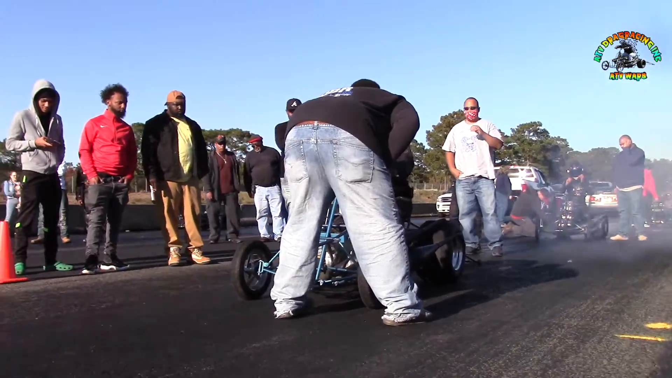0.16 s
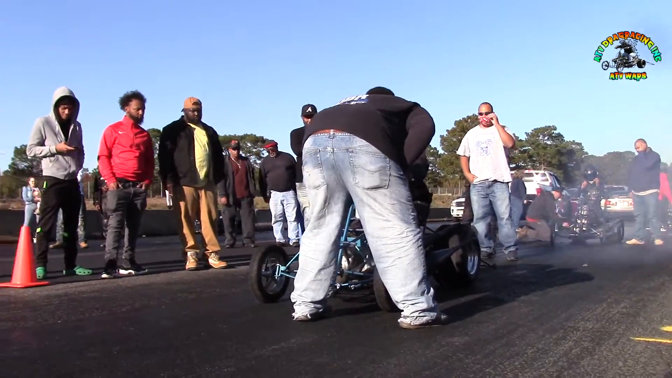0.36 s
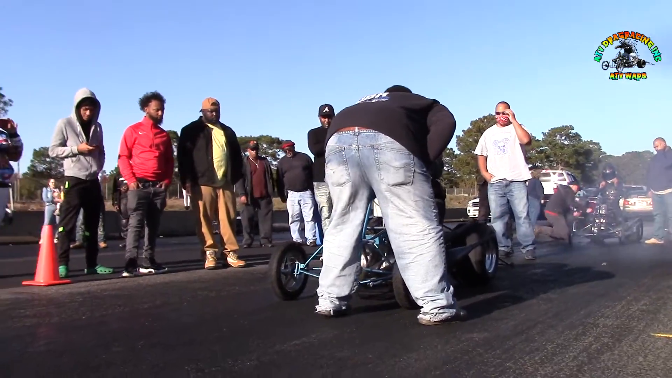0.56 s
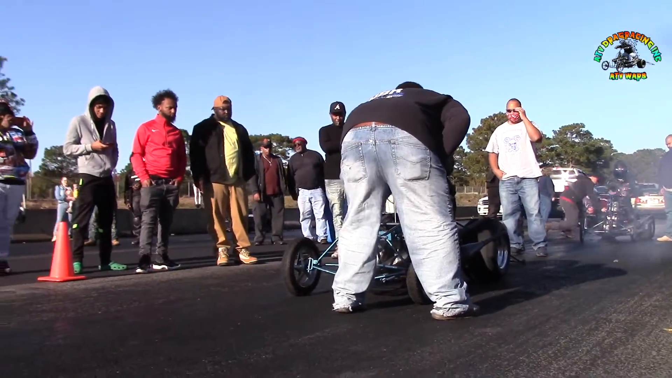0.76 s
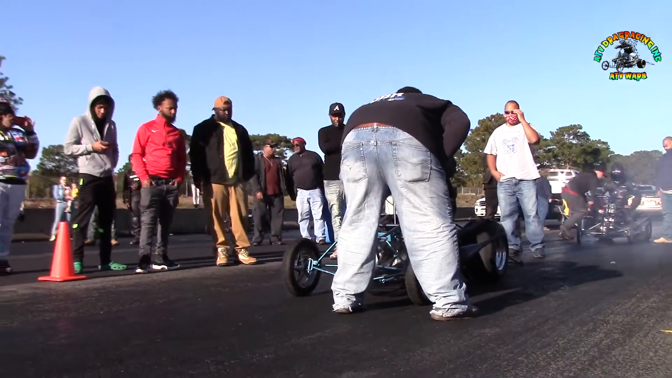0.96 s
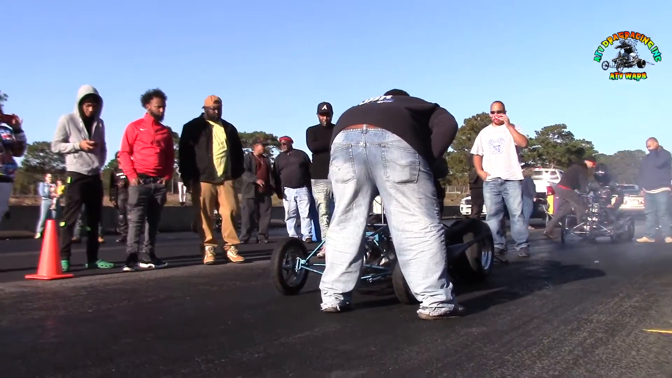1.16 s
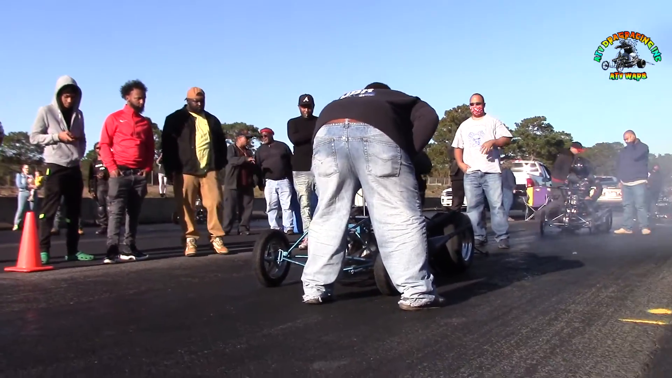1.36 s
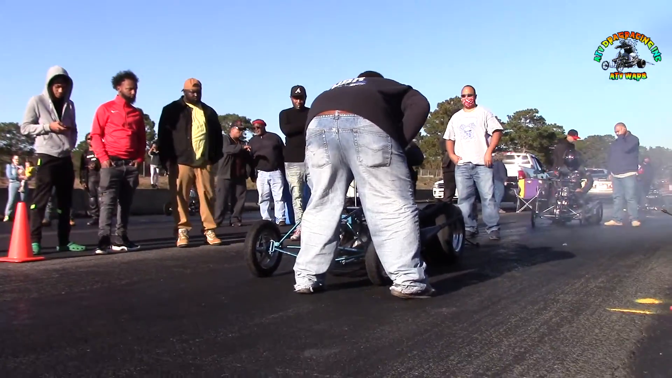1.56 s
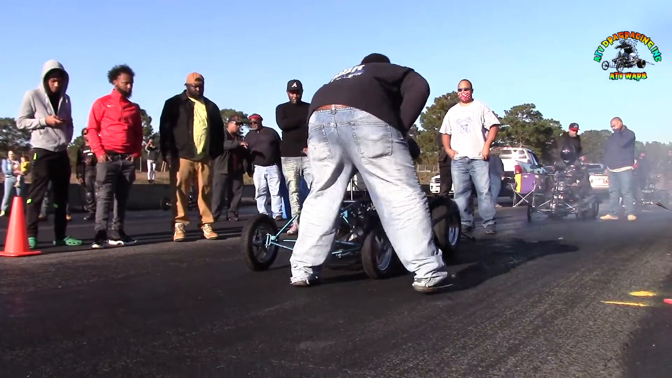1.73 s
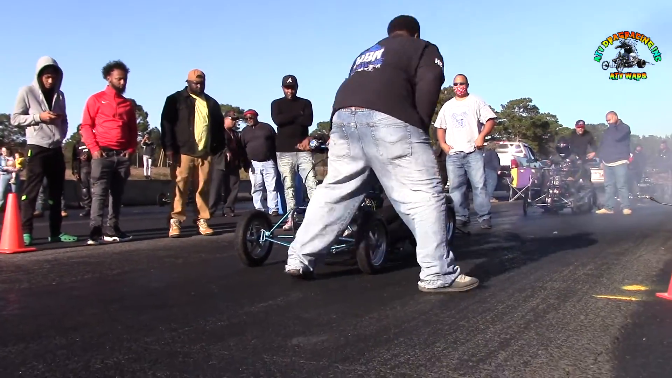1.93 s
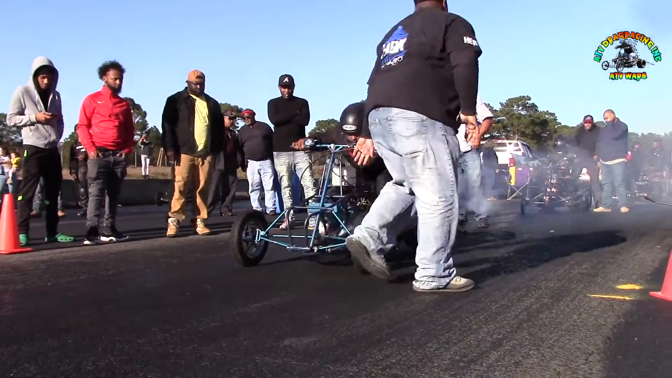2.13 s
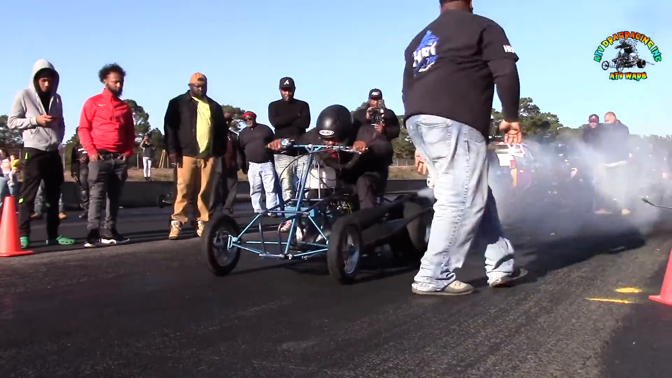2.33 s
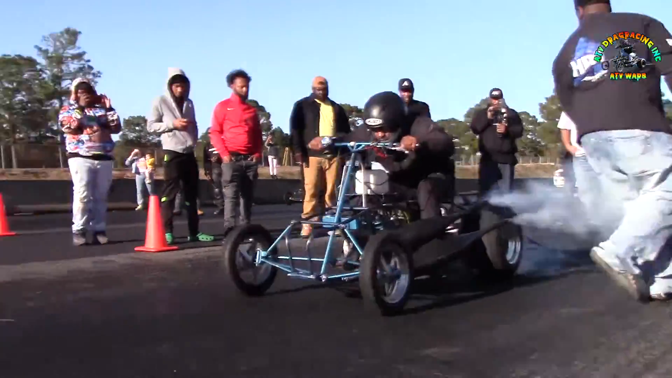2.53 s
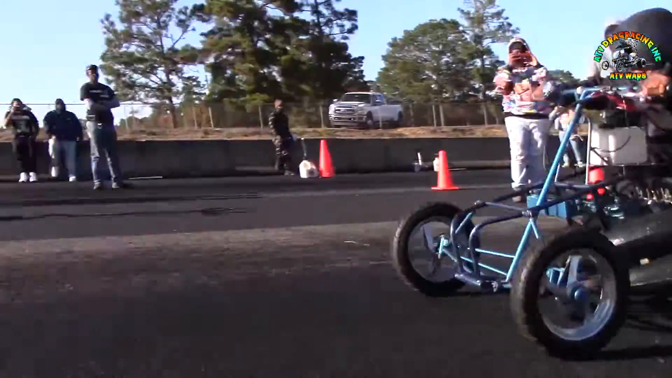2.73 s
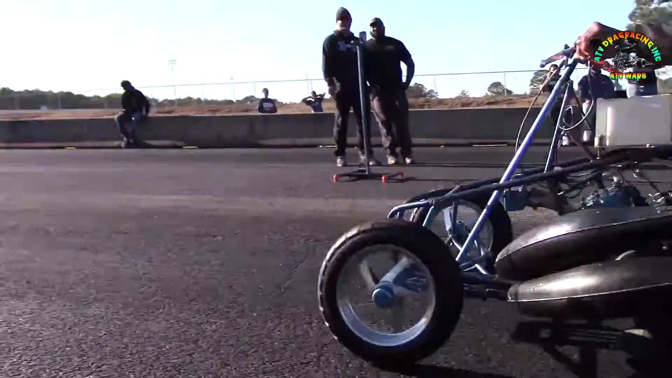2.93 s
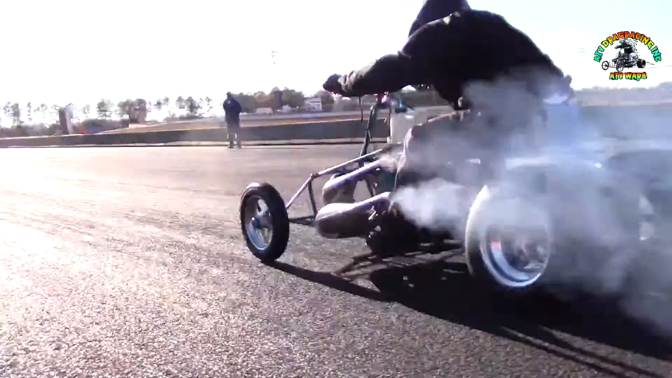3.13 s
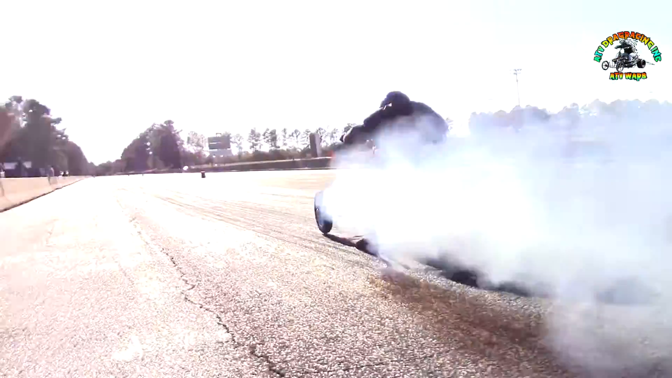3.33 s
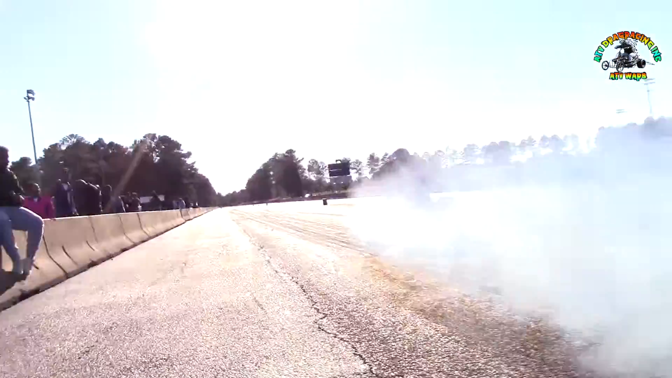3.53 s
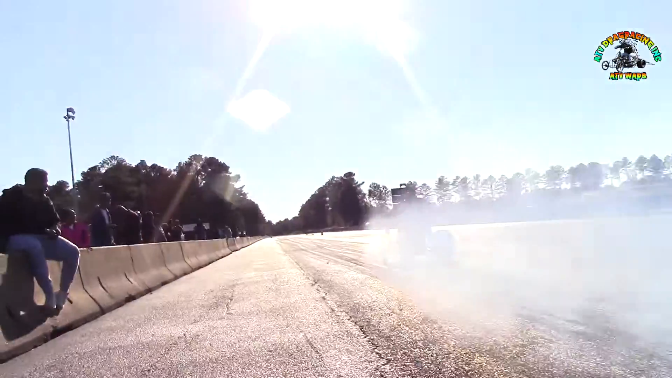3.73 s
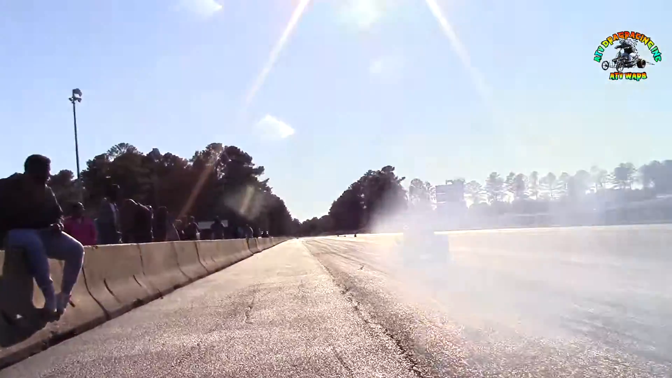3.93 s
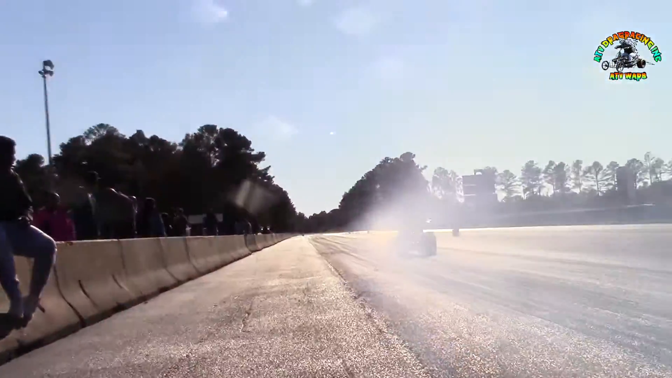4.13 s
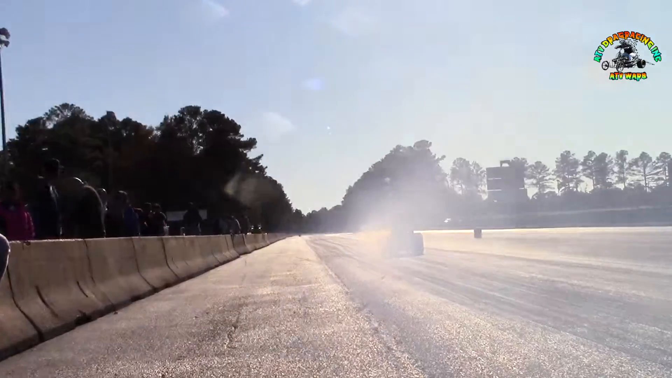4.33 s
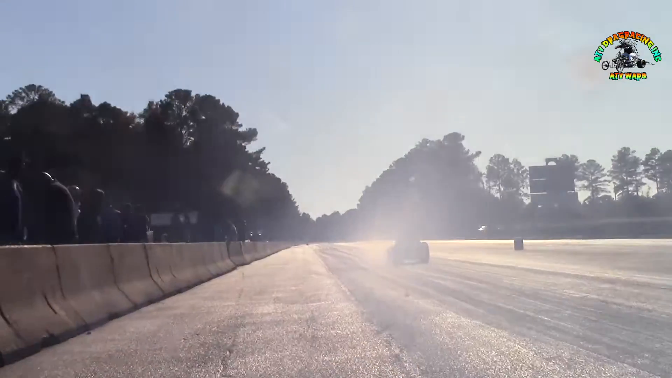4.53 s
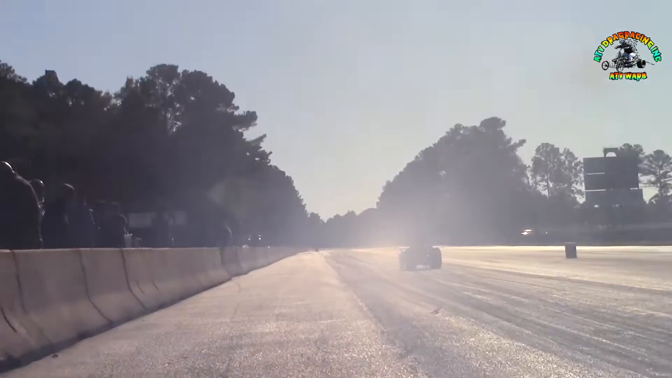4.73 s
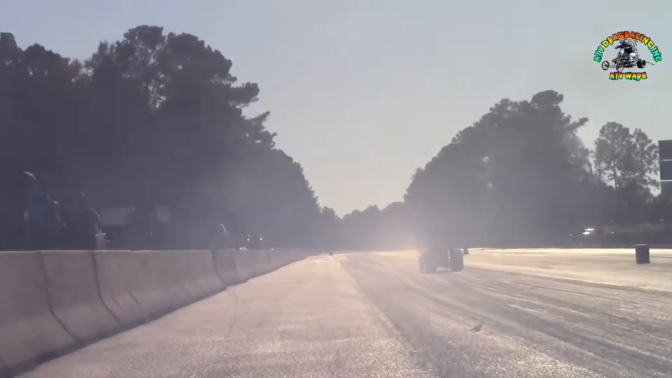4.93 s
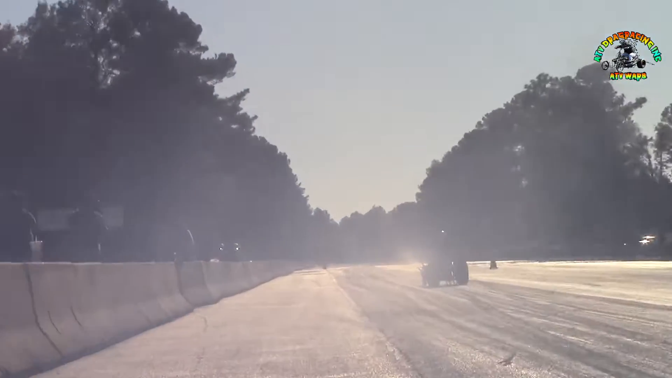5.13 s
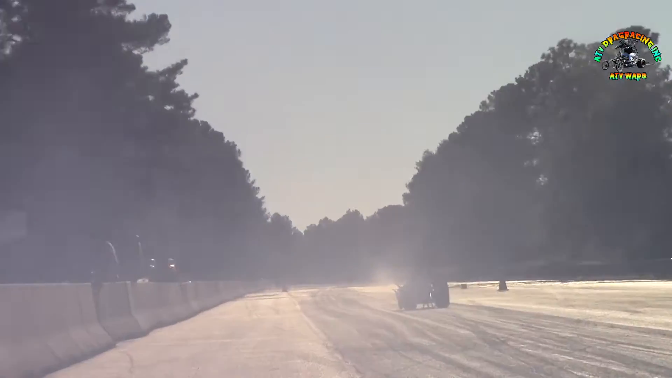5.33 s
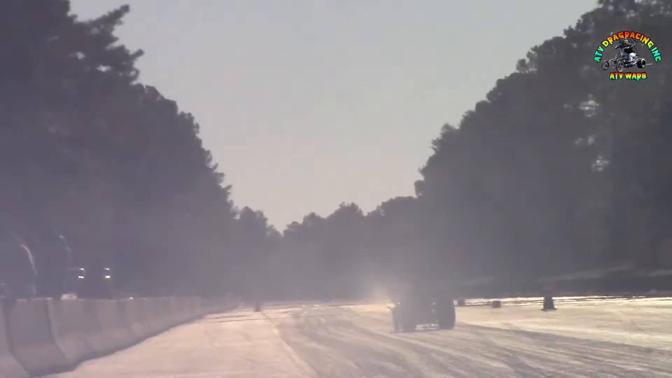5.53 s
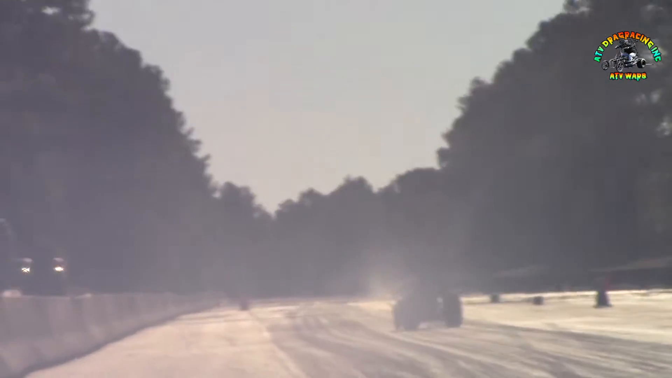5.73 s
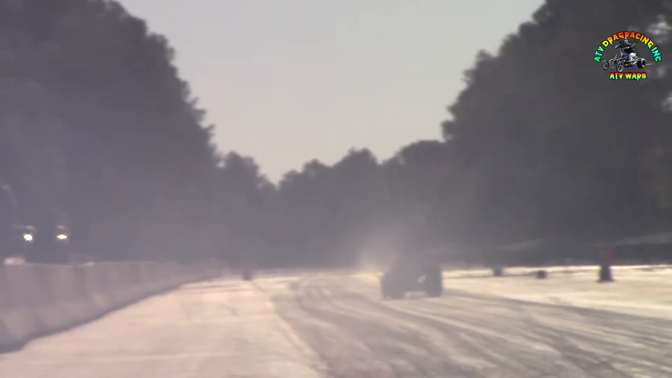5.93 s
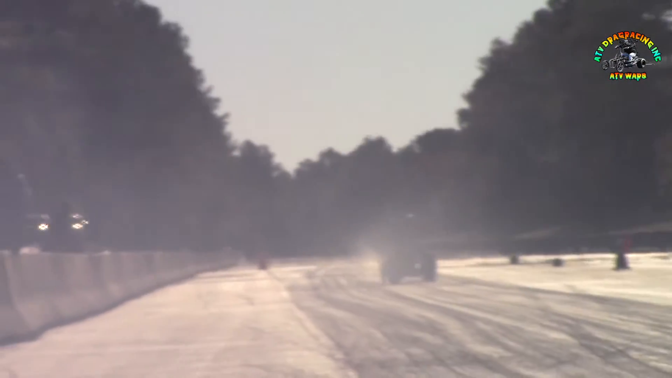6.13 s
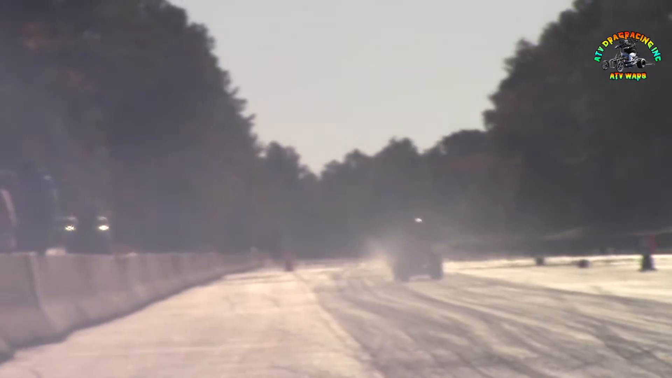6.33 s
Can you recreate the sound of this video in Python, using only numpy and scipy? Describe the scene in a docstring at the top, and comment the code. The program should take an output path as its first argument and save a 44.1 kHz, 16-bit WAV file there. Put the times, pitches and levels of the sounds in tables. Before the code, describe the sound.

From the start, a small two-cylinder dragster engine is held against its rev limiter close by, outdoors. Sharp, irregular exhaust bangs crackle many times a second over a weak patter and a hollow pipe hoot, which slowly rise in pitch and level. At about 2.1 seconds the car launches: the pitch jumps, wavers briefly, and the pulses merge into a loud, harsh, rasping roar with thin ringing overtones. It sweeps past the microphone around 3 seconds, with quick reflections off a concrete barrier. From about 3.3 seconds it howls away down the strip, gradually losing its rasp and getting somewhat quieter. The revs sag and recover near 3.3, 4.1 and 5.3 seconds, and drop again at 6.2. Very faint, low puffs of wind come between 2.5 and 4.7 seconds. The distant engine remains a clear, pulsing buzz with an echo off the trees until about 6.5 seconds.

```python
"""A two-cylinder mini dragster waits at the starting line, held against its rev limiter.
Weak firings patter and make the pipe hoot, while unburnt fuel lights in the pipes with sharp bangs.
After about two seconds it launches, and its exhaust pulses merge into a harsh roar as it sweeps past.
Soft puffs of wind brush by as it howls away down the strip, its revs sagging at each shift.
Far off, the paired firing pulses stand clear, with an echo off the trees."""
import sys
import numpy as np
from scipy import signal
from scipy.fft import rfft, irfft
from scipy.io import wavfile
from scipy.ndimage import uniform_filter1d, minimum_filter1d, map_coordinates

SR = 44100
rng = np.random.default_rng(int(sys.argv[2]) if len(sys.argv) > 2 else 0)


def write(x):
    x = np.atleast_2d(x).T
    wavfile.write(sys.argv[1], SR, np.round(np.clip(x, -1, 1) * 32767).astype(np.int16))


N = 285768
TIME = np.arange(N) / SR
LAUNCH_S = 2.11


def amp(db):
    """Turns decibels into a number to multiply by."""
    return 10 ** (np.asarray(db) / 20)


def unit(x):
    """Scales a signal to an average power of 1."""
    return x / np.sqrt(np.mean(x ** 2) + 1e-20)


def curves(rows):
    """Joins a table's rows with straight lines: one curve for each column after the time."""
    seconds, *columns = np.transpose(rows)
    return [np.interp(TIME, seconds, column) for column in columns]


def wander(rate_hz):
    """A smooth random wobble, about 1 in size and mostly slower than rate_hz."""
    hz = np.fft.rfftfreq(N, 1 / SR)
    return unit(irfft(rfft(rng.standard_normal(N)) / (1 + (hz / rate_hz) ** 4), N))


def butter(order, hz, kind="low"):
    """Designs a filter that keeps the lows, the highs or a band."""
    return signal.butter(order, hz, kind, fs=SR, output="sos")


def colour(x, points, causal=1, size=4096):
    """Shapes the tone by (Hz, relative dB) points; causal=1 keeps attacks sharp, 0 smears both ways."""
    point_hz, db = np.transpose(points)
    hz = abs(np.fft.fftfreq(size, 1 / SR))
    curve_db = np.interp(np.log(hz + 1), np.log(point_hz + 1), db)
    log_gain = np.log(amp(np.maximum(curve_db, -100)))
    phase = -causal * signal.hilbert(log_gain).imag
    taps = np.fft.fftshift(np.fft.ifft(np.exp(log_gain + 1j * phase)).real)
    return signal.oaconvolve(x, taps / np.linalg.norm(taps))[size // 2:][:N]


def steady(x, size=3000):
    """Evens out the loudness, holding the short-term power near 1."""
    power = uniform_filter1d(uniform_filter1d(x ** 2, size), size // 2)
    return x / np.sqrt(abs(power) + 1e-14)


def clicks(times, heights, reach=8):
    """Clean clicks at exact times, even between samples."""
    at = times[:, None] * SR
    index = np.floor(at).astype(int) + np.arange(1 - reach, reach + 1)
    shape = np.sinc(index - at) * np.cos(np.pi * (index - at) / (2 * reach)) ** 2
    return np.bincount(np.clip(index, 0, N).ravel(), (heights[:, None] * shape).ravel(), N + 1)[:N]


def firings(speed_hz, stagger, most=2400):
    """Each firing's time, cylinder (0 or 1), random slip in timing and random punch in strength."""
    cycles = np.cumsum(speed_hz) / SR
    whole = np.arange(int(cycles[-1]))
    first = np.interp(whole, cycles, TIME)
    second = np.interp(whole, cycles - stagger, TIME)  # trails by a share of a cycle
    times = np.ravel([first, second], "F")
    slip, punch = rng.standard_normal((2, most))[:, :len(times)]
    return times, np.arange(len(times)) % 2, slip, punch


def puffs(pulses, decay_s):
    """A puff of swirling gas after each pulse, with the same energy as the pulse."""
    decay = np.exp(-2 / (decay_s * SR))
    power = signal.lfilter([1 - decay], [1, -decay], pulses ** 2)
    return np.sqrt(power) * rng.standard_normal(N)


def scatter(x, t60, delay_s, drift_hz, count=3):
    """Many small echoes that fall 60 dB in t60 seconds; their pattern drifts as things move."""
    age = np.arange(SR // 2) / SR
    out, start = np.zeros(N), rng.random()
    for k in range(count):
        sparse = rng.standard_normal(len(age)) * (rng.random(len(age)) < .1)
        echoes = sparse * amp(-60 * age / t60) * (age > delay_s)
        fade = np.cos(np.pi * (drift_hz * TIME + start + k / count)) * np.sqrt(2 / count)
        out += fade * signal.oaconvolve(x, echoes / np.linalg.norm(echoes))[:N]
    return out


# The revs kick up and coast on the line. Each row: time in seconds, engine cycles per second.
IDLE_SPEED = [(.04, 86), (.11, 81), (.2, 83), (.28, 82), (.32, 88), (.37, 85), (.42, 89), (.45, 87),
              (.5, 90.5), (.54, 88), (.6, 91), (.65, 88.5), (.7, 93.5), (.83, 93), (.88, 96.5), (1.02, 96),
              (1.08, 101), (1.13, 99), (1.18, 105), (1.24, 102.5), (1.4, 108), (1.6, 106), (1.66, 100),
              (1.73, 104), (1.79, 101), (1.88, 98.5), (1.96, 103), (2.01, 100), (2.07, 105)]
# The sound between the bangs. Each row: time in seconds, patter level in dB, hoot level in dB.
IDLE_LEVELS = [(0.1, -30, -37.5), (.21, -33, -37.5), (.29, -27, -36), (.36, -29, -33), (.45, -30, -33.5),
               (.65, -25, -38), (.84, -29.5, -39), (1.0, -27, -36), (1.28, -22, -33), (1.6, -23.5, -33),
               (1.81, -22, -27.5), (1.94, -23, -27.5), (2.0, -23.5, -29.5), (2.1, -22.5, -28)]
# The tone of the patter and of the pipe's hoot. Each row: frequency in Hz, relative level in dB.
PATTER_COLOUR = [(100, -58), (206, -28.5), (358, -37), (420, -2.5), (510, -10), (610, -12), (730, -3),
                 (3000, -2.5), (7000, -9.5), (9600, -20), (13000, -30), (16000, -33)]
HOOT_COLOUR = [(100, -42.5), (200, -25.5), (340, -32.5), (410, -14), (500, 2), (585, 3.5), (660, -12),
               (730, -2), (830, -9.5), (1050, -12), (2000, -48)]

def idle():
    """Weak, uneven firings tick between the bangs and make the pipe hoot over a faint hum."""
    speed_hz = curves(IDLE_SPEED)[0]
    patter_db, hoot_db = curves(IDLE_LEVELS)
    times, cylinder, slip, punch = firings(speed_hz, stagger=.42)
    pulses = clicks(times + .00013 * slip, amp(2.7 * punch - 6 * cylinder))
    bounced = pulses + np.roll(pulses, round(.00032 * SR))
    patter = steady(colour(bounced + amp(-1) * puffs(pulses, decay_s=.007), PATTER_COLOUR))
    breaths = clicks(times + .00006 * slip, amp(1.5 * punch - 6 * cylinder))
    throb = amp(1.5 * wander(rate_hz=20.6))
    hoot = steady(colour(breaths, HOOT_COLOUR)) * throb
    hum = amp(-29.5) * np.sin(4 * np.pi * np.cumsum(speed_hz) / SR)
    fade_out = np.clip((LAUNCH_S + .15 - TIME) / .031, 0, 1)
    return fade_out * (amp(patter_db) * patter + amp(hoot_db) * (hoot + hum))


# Fuel lighting in the pipes. Each row: start in seconds, crack level and flame level in relative dB.
BANGS = [(0.0092, 0, -20.5), (0.0225, -4, -21.5), (0.1087, -10, -27), (0.1188, 0.5, -19), (0.1324, -2, -25),
         (0.1496, -3, -25), (0.162, -1, -31), (0.228, 1, -23.5), (0.2403, 1, -25), (0.254, -6, -29),
         (0.2824, -2, -20), (0.2881, -18, -25), (0.301, -1, -27), (0.312, -0.5, -39), (0.3825, -1.5, -21),
         (0.389, 0, -29), (0.3935, -3, -29), (0.4405, -16, -48), (0.4525, -14, -43), (0.4679, -2, -31),
         (0.4734, -3, -21.5), (0.4787, -3, -22.5), (0.4843, 1, -33), (0.509, -13, -41), (0.53, -9, -35),
         (0.542, -7, -31), (0.553, -4, -32), (0.5573, -2, -24), (0.563, 0, -22), (0.5683, 0, -23.5),
         (0.6392, -3, -19), (0.644, -5, -21.5), (0.6515, -6, -29), (0.6572, -3.0, -22), (0.6678, 8, -28),
         (0.7154, -1.5, -24), (0.7264, -2.5, -24), (0.764, -3, -20), (0.775, -10, -35), (0.8017, -0.5, -25),
         (0.8548, -0.5, -21.5), (0.8607, -4, -23), (0.8715, -4.0, -36), (0.9184, -1, -23.5),
         (0.9292, -6, -24.5), (0.965, -5, -22), (1.0023, -4, -20.5), (1.0487, -8, -19.5), (1.0735, -1, -23),
         (1.084, -9, -20.5), (1.1432, 4, -17), (1.1535, -10, -15), (1.1581, 6, -20), (1.1637, -6, -24),
         (1.1678, -12, -26), (1.1773, -17, -20), (1.2282, 0, -14), (1.2388, 4, -24), (1.2488, 0, -23),
         (1.2718, 1, -17), (1.2762, 1, -26), (1.314, 3, -16), (1.324, 0, -27), (1.3294, -4, -20),
         (1.348, -2.0, -18), (1.3524, -11, -27), (1.358, -8, -27), (1.3608, -7, -17.5), (1.4085, -1, -19),
         (1.4175, 6, -14), (1.427, -7, -31), (1.437, -5, -28), (1.4506, 1, -26), (1.454, -7, -18),
         (1.4589, -7, -20), (1.4637, -8, -23), (1.5291, 2, -18), (1.5376, 4, -20), (1.5473, -2.0, -27),
         (1.5567, -7, -22), (1.5888, 1, -16.5), (1.6054, -10, -35), (1.6333, -4, -22.5), (1.6614, 4, -15.5),
         (1.6711, -3, -17), (1.6956, -9, -14), (1.7, -3, -20), (1.7056, -1, -20), (1.7154, -6, -25),
         (1.7677, -2, -18), (1.7766, -8, -18), (1.827, -4, -16.5), (1.8296, -3, -29), (1.8432, -2, -23),
         (1.8772, -4, -16.5), (1.9237, -11, -19.5), (1.9335, -6, -17.5), (1.9481, -3, -20.5),
         (1.9577, -13, -21.5), (2.025, -5, -17), (2.036, -3, -16.5), (2.1016, -9, -18)]
# The tone of a bang. Each row: frequency in Hz, relative level in dB.
BANG_COLOUR = [(59, -44), (100, -53), (206, -34.5), (358, -23.5), (406, -19), (502, 0), (608, -10),
               (721, -9.5), (930, -14), (1200, -6), (1800, -6.5), (2800, -1.5), (6990, -6.5), (9610, -11),
               (16000, -36.5)]

def backfires(flame_rise_s=.0014, flame_decay_s=.014):
    """Sharp cracks, each doubled by its bounce off the asphalt and followed by a dying rush of flame."""
    starts, crack_db, flame_db = np.transpose(BANGS)
    heights = amp(crack_db + 2)
    cracks = -clicks(starts, heights) - clicks(starts + .00032, heights)
    age = np.arange(SR // 10) / SR
    rush = (1 - np.exp(-age / flame_rise_s)) * np.exp(-age / flame_decay_s)
    flame_power = abs(signal.oaconvolve(clicks(starts, amp(flame_db + 1) ** 2), rush)[:N])
    crackle = rng.standard_normal(N) * amp(4 * wander(rate_hz=900))
    direct = cracks + np.sqrt(flame_power) * unit(crackle)
    echoes = scatter(direct, t60=.075, delay_s=.0009, drift_hz=3.76)
    return colour(direct + amp(-5) * echoes, BANG_COLOUR)


# The tone of the rumble. Each row: frequency in Hz, relative level in dB.
RUMBLE_COLOUR = [(20, -14), (60, -11), (130, -8.5), (170, -6), (240, 1), (500, -23), (2000, -82)]

def rumble(engine, loudest_db=-48, still_air_db=-100):
    """A faint, low noise that swells with the engine's high rasp."""
    rasp = signal.sosfilt(butter(2, 5000, "high"), engine)
    swell = np.sqrt(abs(uniform_filter1d(rasp ** 2, size=700)))
    level = amp(loudest_db) * (swell / swell.max()) ** 1.4 + amp(still_air_db)
    return level * unit(colour(rng.standard_normal(N), RUMBLE_COLOUR))


def exhaust_pulses(speed_hz, roughness):
    """Paired pulses with puffs of gas; the second cylinder trails further when the revs sag."""
    stagger = .437 + .001 * (160 - speed_hz) + .0025 * wander(rate_hz=35)
    times, cylinder, slip, punch = firings(speed_hz, stagger)
    uneven = np.interp(times, TIME, roughness)
    pulses = clicks(times + .000077 * uneven * slip, amp(3.3 * uneven * punch - cylinder))
    gas = signal.sosfilt(butter(3, 420, "high"), puffs(pulses, decay_s=.011))
    hiss = signal.sosfilt(butter(4, 4500, "high"), puffs(pulses, decay_s=.002))
    return (1 - roughness) * pulses + roughness * gas + amp(4.5) * hiss


def trackside_echoes(x, scattered, t60=.069, drift_hz=4, count=6):
    """Short waves bounce off people and track in echoes that come and go; long waves slip past."""
    long_waves = signal.sosfiltfilt(butter(2, 480), x)
    short_waves = x - long_waves
    age, bounced = np.arange(SR // 8) / SR, np.zeros(N)
    for k in range(count):
        echoes = rng.standard_normal(len(age)) * amp(-60 * age / t60) * (age > .0007)
        fade_hz = drift_hz * (k + .5) / count
        fade = np.cos(2 * np.pi * (fade_hz * TIME + rng.random())) * np.sqrt(2 / count)
        bounced += fade * signal.oaconvolve(short_waves, echoes / np.linalg.norm(echoes))[:N]
    return long_waves + np.sqrt(1 - scattered ** 2) * short_waves + scattered * bounced


# The echo lags most as the car passes. Each row: time in seconds, delay in seconds, level in dB.
BARRIER_ECHO = [(2.1, .011, -8), (2.45, .012, -7), (2.65, .0145, -3), (2.9, .023, -11), (3.15, .024, -12),
                (3.4, .016, -8), (3.6, .0125, -6), (3.9, .0095, -7), (4.2, .0075, -20), (5.0, .005, -26),
                (6.48, .003, -24)]

def barrier_echo(x):
    """A concrete barrier's echo: its changing delay bends its pitch, so it beats with the direct sound."""
    delay_s, db = curves(BARRIER_ECHO)
    read_at = np.arange(N) - SR * uniform_filter1d(delay_s, size=6000)
    return amp(db) * map_coordinates(x, [read_at], order=3)


# The exhaust's tone from four viewpoints. Each row: frequency in Hz, relative level in dB.
FROM_FRONT = [(35, -57), (60, -66), (250, -13.5), (338, -8.5), (389, -12), (503, -11.5), (924, -11.5),
              (1040, -5.5), (1250, -9.5), (1550, -6.5), (3040, -2), (4320, -15), (8920, -24.5),
              (14900, -40.5), (16000, -47)]
FROM_BEHIND = [(59, -62), (100, -74), (271, -15), (328, -18), (415, -4), (676, 4.5), (820, -1), (1000, -5),
               (1170, -5.5), (1650, -1.5), (2300, 0.5), (2900, 1), (4110, -12), (7140, -18.5), (16000, -41)]
DOWN_STRIP = [(100, -50), (165, -26.5), (250, -27), (325, -0.5), (480, -2), (650, -1), (810, 5),
              (1130, 5.5), (1460, 10.5), (1750, 7), (1950, 4), (2300, 7), (2900, 5.5), (3400, 2.5),
              (4200, -7), (8000, -19.5), (15500, -43)]
FAR_OFF = [(100, -67), (160, -37.5), (230, -34), (300, -8.5), (470, -4), (620, -4), (780, -2), (920, -4),
           (1080, 2), (1420, 7), (1700, 2), (2000, 3), (2800, 1), (4200, -8.5), (8000, -28.5), (15000, -62)]
# When each of those tones is heard alone. Each row: start in seconds, end in seconds.
VIEW_TIMES = [(2.0, 3.0), (3.25, 3.95), (4.15, 5.1), (5.3, 6.5)]

def passing_tone(x):
    """One tone blends into the next as the car's angle and distance change."""
    views = [FROM_FRONT, FROM_BEHIND, DOWN_STRIP, FAR_OFF]
    out = np.zeros(N)
    for chosen, points in zip(np.eye(len(views)), views):
        share = np.interp(TIME, np.ravel(VIEW_TIMES), np.repeat(chosen, 2))
        out += share * colour(x, points, causal=.55)
    return out


# The borders in Hz between five bands, from low to high: boom, drone, body, bark and rasp.
BAND_EDGES_HZ = [400, 950, 2000, 4200]
# The exhaust's lowest band. Each row: time in seconds, boom level in dB.
BOOM_LEVEL = [(2.11, -44), (2.18, -24), (2.29, -33.5), (2.35, -19.5), (2.51, -38), (2.56, -28), (3.11, -47),
              (3.19, -35.5), (4.28, -36), (4.69, -42), (5.16, -34), (5.33, -45.5), (5.47, -36),
              (6.48, -42.5)]
# Its other bands. Each row: time in seconds, then the drone, body, bark and rasp levels in dB.
UPPER_LEVELS = [(2.13, -26.5, -20, -15, -19), (2.53, -27.5, -21, -12.5, -13.5),
                (2.67, -31.5, -26.5, -20.5, -20.5), (3.17, -33, -24, -18, -17),
                (3.23, -31, -18.5, -16, -17), (3.83, -32.5, -26, -25.5, -34),
                (3.88, -31, -27.5, -29.5, -34), (3.95, -38, -29, -28, -33.5), (4.06, -28.5, -31, -28, -31),
                (4.12, -28.5, -28, -23.5, -27.5), (4.19, -28, -22, -21.5, -27),
                (4.26, -29, -23.5, -28.5, -28.5), (4.31, -34, -22, -18.5, -28.5),
                (4.49, -36, -23, -22.5, -31), (4.55, -36.5, -21, -19.5, -32.5), (4.82, -35, -24, -24, -35),
                (4.84, -36.5, -23.5, -24.5, -39), (4.94, -31.5, -30, -22.5, -38),
                (4.98, -32, -25, -29, -38), (5.0, -32, -27, -24, -37), (5.12, -31.5, -34, -28.5, -39),
                (5.14, -34, -34, -25.5, -38), (5.17, -34, -32, -27, -37), (5.19, -33, -29, -29, -39),
                (5.22, -37, -27, -18, -34.5), (5.26, -40, -26, -25, -34.5), (5.29, -34, -23, -25, -34.5),
                (5.34, -32.5, -19, -20, -30), (5.42, -35, -23.5, -26.5, -33.5),
                (5.57, -35, -23, -25.5, -38.5), (5.6, -44, -25.5, -24.5, -34.5),
                (5.65, -33, -19.5, -27, -37), (5.68, -38, -21, -23, -35.5), (5.84, -42, -21.5, -25, -37.5),
                (5.95, -37.5, -17.5, -21, -39), (6.01, -38, -21, -28.5, -42),
                (6.15, -38, -28, -29.5, -44.5), (6.22, -33, -23, -29.5, -42),
                (6.24, -30, -21.5, -25.5, -40), (6.33, -30, -25.5, -25, -44), (6.36, -30, -26, -29, -41),
                (6.39, -31, -28, -25, -40), (6.42, -31, -27, -30.5, -43), (6.46, -29, -33, -26.5, -45)]

def passing_loudness(x):
    """Each band of the exhaust rises and falls on its own as the car turns and moves away."""
    below = [signal.sosfiltfilt(butter(6, hz), x, padtype="even") for hz in BAND_EDGES_HZ]
    bands = np.diff([np.zeros(N), *below, x], axis=0)
    levels_db = curves(BOOM_LEVEL) + curves(UPPER_LEVELS)
    return sum(amp(db) * steady(band) for db, band in zip(levels_db, bands))


# The revs sag at each shift and surge as the drive slips and grips.
# Each row: time in seconds, engine cycles per second as heard.
RUN_SPEED = [(2.12, 140.2), (2.16, 153.0), (2.195, 172.3), (2.23, 152.0), (2.275, 138.5), (2.32, 152.4),
             (2.37, 166.1), (2.44, 170.8), (2.55, 170.8), (2.7, 176.7), (2.9, 177.6), (3.03, 176.5),
             (3.1, 172.6), (3.22, 170.9), (3.25, 168.0), (3.275, 152.6), (3.33, 162.3), (3.41, 168.4),
             (3.48, 165.6), (3.7, 167.8), (3.8, 165.2), (3.9, 166.6), (4.05, 164.1), (4.08, 153.2),
             (4.125, 149.1), (4.16, 157.0), (4.21, 163.5), (4.26, 164.8), (4.32, 161.5), (4.37, 154.8),
             (4.42, 153.5), (4.48, 157.3), (4.57, 164.6), (4.64, 160.8), (4.69, 157.3), (4.75, 159.8),
             (4.81, 166.7), (4.86, 164.3), (4.92, 159.6), (5.03, 162.3), (5.12, 164.2), (5.19, 162.1),
             (5.22, 150.8), (5.29, 141.7), (5.34, 144.0), (5.39, 150.3), (5.47, 152.4), (5.62, 152.2),
             (5.78, 148.4), (5.82, 150.2), (5.87, 159.3), (5.92, 156.6), (5.98, 153.9), (6.08, 155.4),
             (6.14, 158.8), (6.18, 147.3), (6.27, 131.3), (6.32, 130.8), (6.38, 136.5), (6.42, 131.8),
             (6.48, 132.3)]
# How ragged the roar is. Each row: time in seconds, roughness (0 to 1), scattered sound (0 to 1).
RUN_TEXTURE = [(2.1, .68, .9), (2.3, .62, .9), (2.44, .34, .9), (2.72, .56, .85), (2.9, .38, .85),
               (3.2, .32, .85), (3.3, .3, .85), (3.45, .22, .85), (3.85, .15, .85), (4.06, .24, .8),
               (4.2, .08, .2), (4.38, .15, .2), (4.56, .04, .1), (4.73, .13, .2), (4.85, .08, .25),
               (5.15, .1, .6), (5.24, .28, .6), (5.6, .22, .3), (5.76, .3, .3), (5.87, .1, .15),
               (5.96, .24, .2), (6.08, .1, .35), (6.2, .22, .6), (6.48, .16, .65)]

def full_throttle(shudder_hz=24):
    """The run down the strip: the shuddering engine's exhaust, its echoes and its singing notes."""
    shudder = np.sin(2 * np.pi * shudder_hz * TIME + 2 * wander(rate_hz=4.27))
    speed_hz = curves(RUN_SPEED)[0] * (1 + .0025 * wander(rate_hz=30) + .0045 * shudder)
    roughness, scattered = curves(RUN_TEXTURE)
    exhaust = trackside_echoes(exhaust_pulses(speed_hz, roughness), scattered)
    exhaust += barrier_echo(exhaust)
    exhaust += amp(-11.5) * scatter(exhaust, t60=1.0, delay_s=.028, drift_hz=1.24)  # the trees answer
    roar = passing_loudness(passing_tone(exhaust))
    fade_in = np.clip((TIME - LAUNCH_S + .0077) / .033, 0, 1)
    return fade_in * amp(.5 * shudder) * roar + singing(speed_hz)


# Engine overtones that sing out.
# Each row: start in seconds, end in seconds, vibrations per engine cycle, level in dB.
SINGING_NOTES = [(2.14, 2.24, 2, -26), (2.28, 2.42, 2, -27), (2.38, 2.62, 18, -20), (2.36, 2.58, 20, -25),
                 (2.34, 2.45, 22, -25), (2.37, 2.58, 14, -27), (2.36, 2.6, 12, -28), (2.62, 3.05, 12, -24),
                 (2.72, 3.03, 19, -29), (2.62, 3.0, 9, -28), (2.9, 3.25, 10, -26), (3.2, 3.5, 13, -27),
                 (3.3, 3.86, 14, -27), (3.33, 3.8, 7, -28)]

def singing(speed_hz):
    """Single overtones catch a resonance: each one swells, wavers and fades."""
    cycles = np.cumsum(speed_hz) / SR
    waver, out = wander(rate_hz=38), np.zeros(N)
    for k, (start, end, multiple, db) in enumerate(SINGING_NOTES):
        progress = np.clip((TIME - start) / (end - start), 0, 1)
        swell = np.sqrt(abs(np.sin(np.pi * progress)))
        own_waver = np.roll(waver, k * SR // 3)
        level = amp(db + 3.5 * np.roll(own_waver, SR))
        out += level * swell * np.sin(2 * np.pi * multiple * cycles + .45 * own_waver)
    return out


# Gusts of wind. Each row: time of the peak in seconds, fade time in seconds, level in dB.
GUSTS = [(2.55, .2, -56), (3.3, .15, -55), (3.57, .05, -51), (4.7, .15, -59)]

def wind():
    """Moving air brushes the microphone in soft, low puffs."""
    strength = sum(amp(db) * np.exp(-((TIME - peak_s) / fade_s) ** 2) for peak_s, fade_s, db in GUSTS)
    return strength * unit(signal.sosfilt(butter(2, [145, 200], "band"), rng.standard_normal(N)))


# How much the two ears differ, by pitch. Each row: frequency in Hz, relative level in dB.
WIDTH_BY_PITCH = [(20, -61), (1000, -91), (2500, -50), (5000, -24.5), (9000, -27), (14000, -11)]
# The sound is widest as the car sweeps past. Each row: time in seconds, added width in dB.
WIDTH_BY_TIME = [(0, 3.5), (2.0, -7), (2.4, -21), (2.92, 15), (3.3, -27), (6.48, -22)]

def stereo_spread(x):
    """Very short echoes make the treble differ between the ears."""
    hz, db = np.transpose(WIDTH_BY_PITCH)
    treble_gain = amp(np.interp(np.fft.rfftfreq(N, 1 / SR), hz, db))
    echoes = scatter(x, t60=.029, delay_s=.0001, drift_hz=2.36) * amp(curves(WIDTH_BY_TIME)[0])
    return irfft(rfft(echoes) * treble_gain, N)


def scene():
    """Mixes the engine, the wind and the rumble for the left and right ears."""
    engine = backfires() + idle() + full_throttle()
    middle = engine + wind() + rumble(engine)
    side = stereo_spread(middle)
    return np.array([middle + side, middle - side])


def record(dry):
    """Briefly turns down the loudest peaks, then cuts the very highest treble."""
    ceiling, cutoff_hz = .9, 16050
    safe_gain = ceiling / np.maximum(abs(dry).max(0), ceiling)
    smooth_gain = uniform_filter1d(minimum_filter1d(safe_gain, size=301), size=301)
    treble_cut = signal.firwin(511, cutoff_hz, window=("kaiser", 9), fs=SR)
    return signal.oaconvolve(dry * smooth_gain, treble_cut[None], "same")


dry = scene()
out = record(dry)
write(out)
```